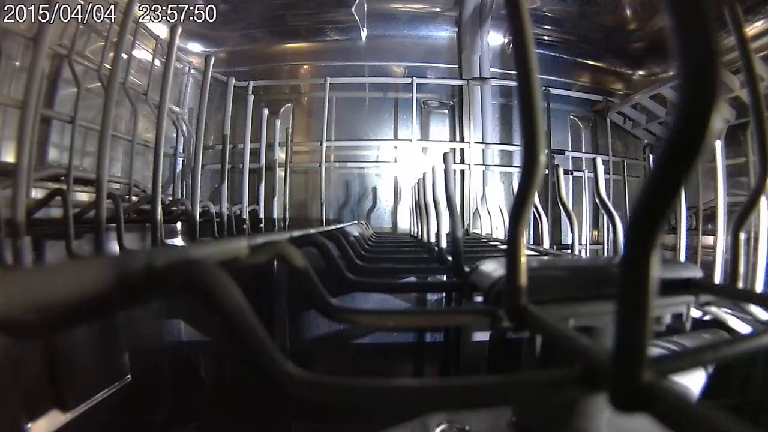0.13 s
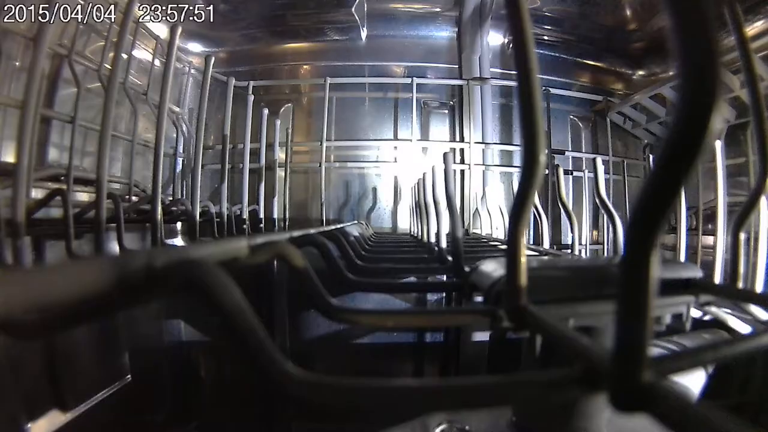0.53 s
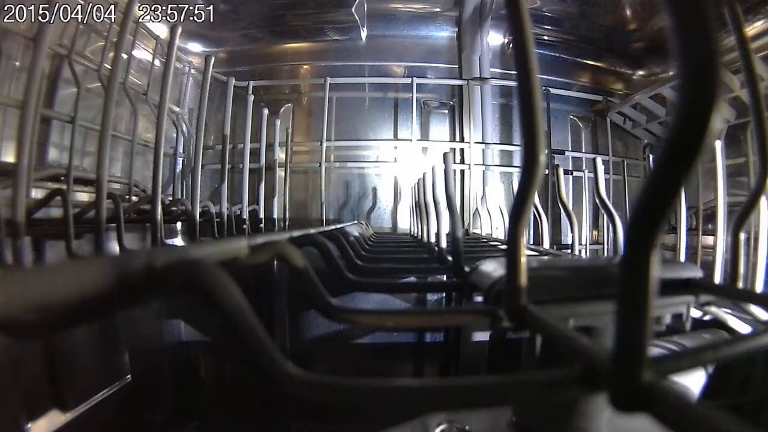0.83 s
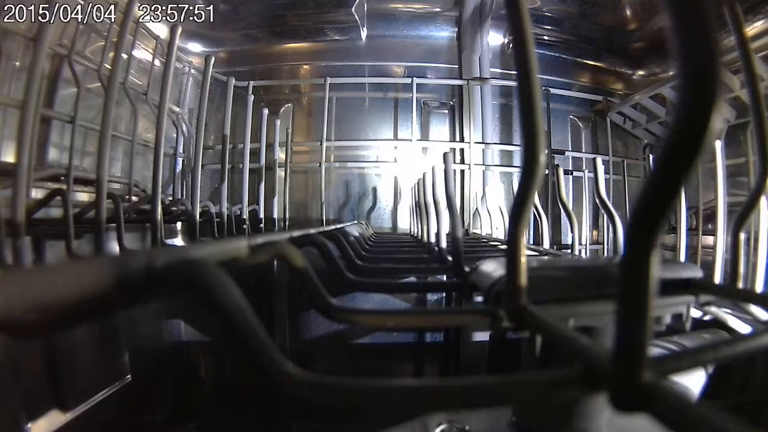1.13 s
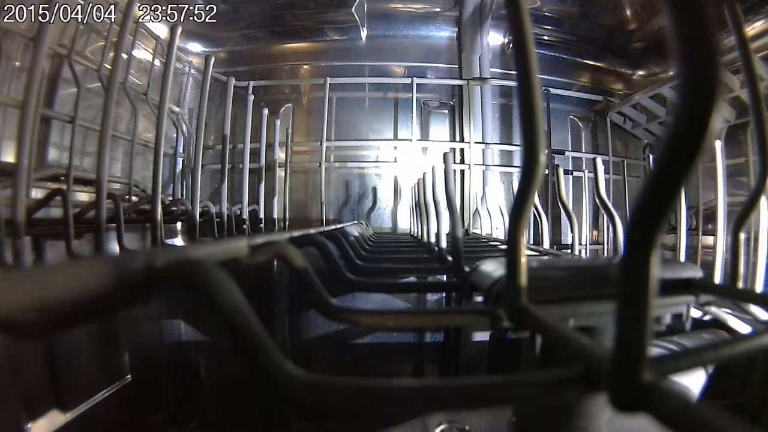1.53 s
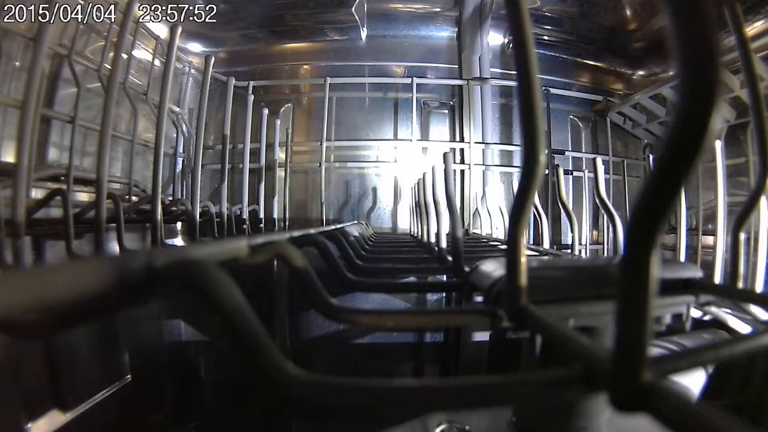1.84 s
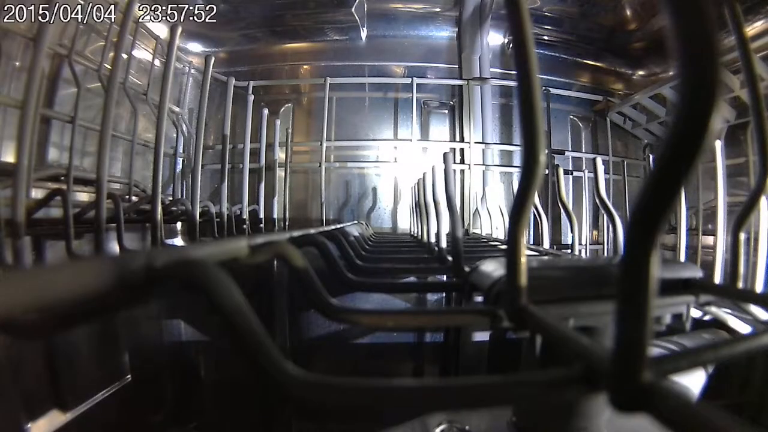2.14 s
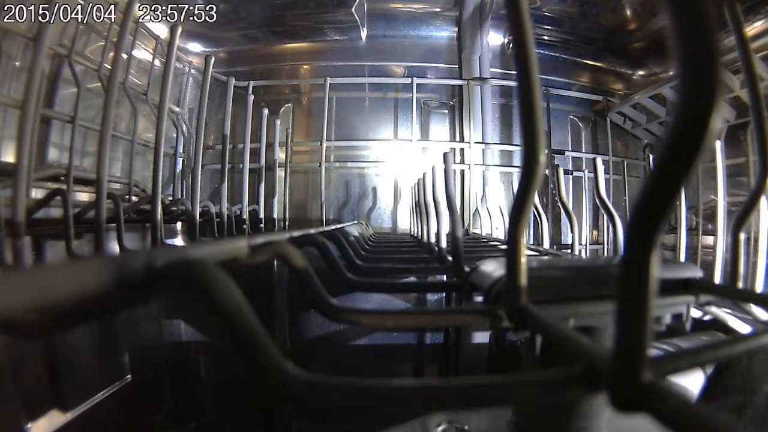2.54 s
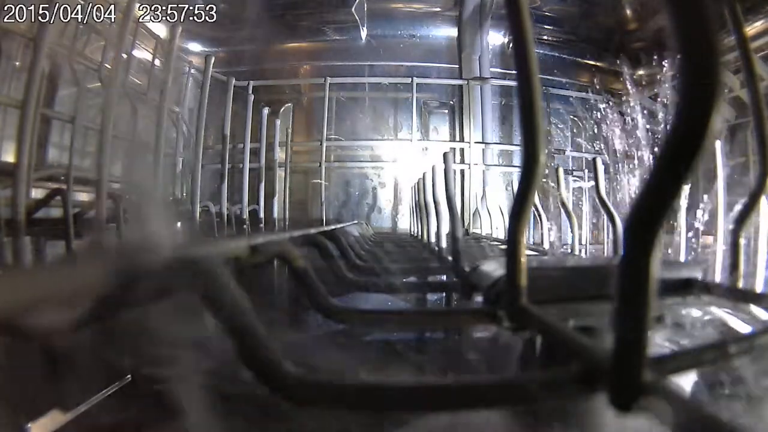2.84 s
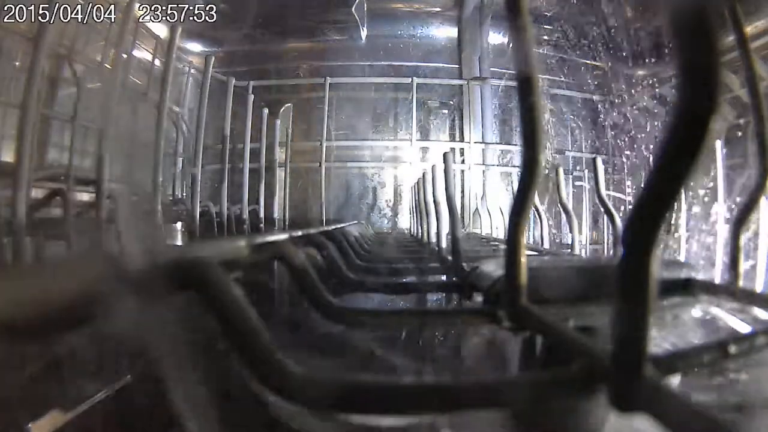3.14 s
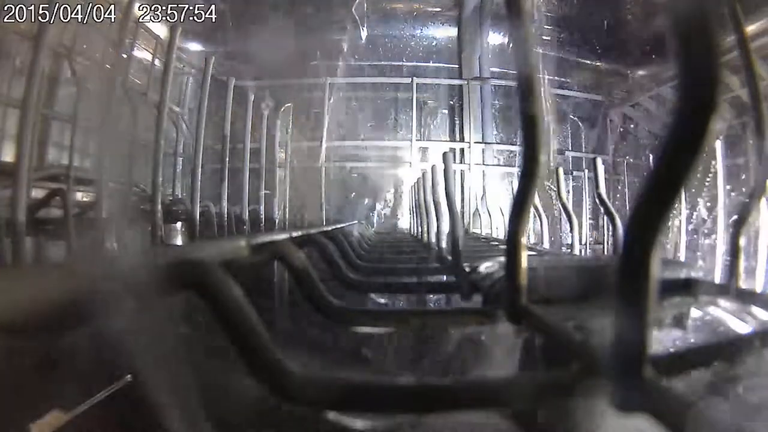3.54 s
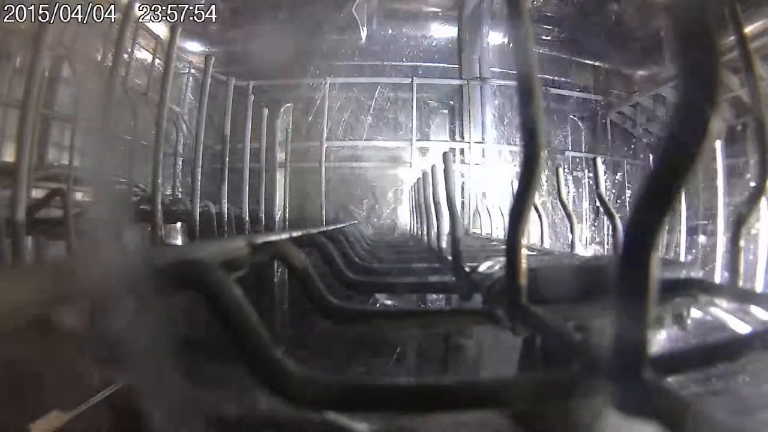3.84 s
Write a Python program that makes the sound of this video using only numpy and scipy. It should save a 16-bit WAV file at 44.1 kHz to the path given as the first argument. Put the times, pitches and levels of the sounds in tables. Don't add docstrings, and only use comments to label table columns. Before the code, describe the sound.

Water trickles and drips in a closed dishwasher, then the pump starts and jets beat hard

```python
import sys
import numpy as np
from scipy import signal
from scipy.fft import rfft, irfft, next_fast_len
from scipy.io import wavfile

SR = 44100
rng = np.random.default_rng(int(sys.argv[2]) if len(sys.argv) > 2 else 0)


def natural_amplitude(level_db):
    exponent = np.asarray(level_db, float) / 20
    return 10 ** exponent


def log_audio(samples):
    frames = np.atleast_2d(samples).T
    limited = np.clip(frames, -1, 1)
    pcm = np.round(limited * 32767).astype(np.int16)
    wavfile.write(sys.argv[1], SR, pcm)


N = 176400
TIME_S = np.arange(N) / SR

# pitch_hz, level_db
VALVE_HUM = [(59.9, -72), (99.8, -74.5), (119.9, -65)]
# pitch_hz, level_db
FILLING_MODES = [(250, -66), (415, -68), (522, -69.5), (640, -57.5), (695, -57), (974, -61.5), (1012, -73),
                 (1064, -63.5), (1130, -62), (1244, -60), (1384, -57.5), (1626, -63.5), (1895, -68),
                 (1997, -69)]
# pitch_hz, level_db
WASHING_MODES = [(269.2, -45.5), (425.3, -46), (516.8, -47.5), (640.6, -43), (694.4, -44.5), (775.2, -42),
                 (829.0, -43), (979.8, -41.5), (1017, -39), (1211, -37), (1351, -43), (1981, -44.5)]
# pitch_hz, level_db (per Hz)
TRICKLE_COLOUR = [(22, -2), (117, -2.5), (200, -14), (1400, -10.5), (2150, -15), (2450, -17.5),
                  (11000, -24.5), (16000, -34.5)]
# pitch_hz, level_db (per Hz)
SURGE_COLOUR = [(60, 4), (193, 10), (484, 0), (900, 5), (1300, 11), (2100, 4.5), (3300, 0), (4000, -20)]
# pitch_hz, level_db (per Hz)
JET_COLOUR = [(1500, 5.5), (2500, 0), (4000, -2.5), (5200, -3), (6700, -11.5), (7900, -6), (10500, 0.5),
              (16000, -5.5)]
# pitch_hz, width_hz, level_db
HOUSING_PEAKS = [(3065, 190, 3.5), (6650, 1160, 7), (7700, 1300, -5), (11000, 2260, 3)]
# start_s, level_db (peak), pitch_hz
POOL_DRIPS = [(0.136, -38, 1420), (0.219, -40, 1280), (0.345, -38, 1430), (0.694, -31.5, 1380),
              (1.031, -36, 1320), (1.18, -33.5, 1280), (1.251, -42, 1160), (1.365, -36.5, 990),
              (1.447, -33.5, 1250), (1.78, -29.5, 1750), (2.141, -21, 927), (2.199, -27, 900),
              (.075, -45, 2930), (.127, -46, 3610), (.135, -46.5, 5000), (.262, -38, 2090),
             (.345, -45.5, 2620), (.547, -45, 2170), (.66, -41.5, 1860), (0.697, -44, 2480),
             (.81, -47, 4250), (.89, -46, 2640), (1.032, -38.5, 3000), (1.04, -41, 4370),
             (1.24, -45.5, 4430), (1.26, -46, 2590), (1.38, -46, 2200), (1.375, -46.5, 4320),
             (1.755, -42.5, 2940), (1.782, -42, 2370), (1.819, -30.5, 1240), (1.896, -48, 4760),
             (1.997, -41, 1970), (2.04, -35, 1370), (2.2, -46, 4800)]
# start_s, level_db (peak), pitch_hz
STEEL_TICKS = [(.11, -57, 12000), (.334, -48.5, 7940), (.53, -54, 11000), (.73, -52, 10100),
               (.74, -53.5, 6800), (.85, -56, 11000), (.95, -57, 11900), (1.08, -55.5, 9800),
               (1.2, -54.5, 11000), (1.38, -57, 9100), (1.71, -57, 10500), (1.9, -52, 10000),
               (1.922, -45.5, 9150), (2.1, -53, 11000), (2.135, -51, 7700)]
# start_s, level_db (peak), pitch_hz
NEAR_SPLATS = [(.696, -25, 1400), (1.782, -27, 1850), (2.142, -26, 950), (3.731, -10, 2200),
               (3.731, -1, 800), (3.7, -7, 1000), (2.711, -5, 11000), (3.354, -17.5, 2900),
               (3.395, -16, 6860), (3.407, -18, 6500), (3.467, -14.5, 5200), (3.467, -5, 2580),
               (3.495, -8.5, 5300), (3.495, -18, 2200), (3.496, -4.5, 8000), (3.68, -12, 2200),
               (3.695, -20, 5500), (3.699, 0, 1630), (3.730, 2.5, 1560), (3.835, -13, 1300),
               (3.91, -20, 1400), (3.915, -20, 6600), (3.953, -18, 5500), (3.938, -10, 2040),
               (3.980, -11, 5270)]
# start_s, level_db (peak), pitch_hz
SHEET_SPLASHES = [(2.44, -15, 1350), (2.495, -23, 4230), (2.54, -15, 1170), (2.57, -18, 2050),
                  (2.61, -20, 2030), (2.675, -21, 3354), (2.7, -24.5, 3030), (2.711, -20, 11750),
                  (2.74, -18, 1310), (2.83, -19.5, 2040), (2.855, -27, 11000), (2.905, -21.5, 3200),
                  (2.965, -26, 3040), (3.065, -27, 11000), (3.13, -23, 1440), (3.3, -27, 2000),
                  (3.375, -28, 1390), (3.42, -26, 1440), (3.53, -25, 1370), (3.625, -29, 1190),
                  (3.355, -30, 2920), (3.555, -34.5, 5700), (3.59, -27, 311), (3.655, -31, 2880),
                  (3.732, -24, 1570), (3.77, -27, 1410), (3.88, -22, 970), (3.9, -25, 1290),
                  (3.92, -34, 5900)]
# time_s, level_db
SHAKE_CURVE = [(2.035, -48.5), (2.1, -33.5), (2.2, -47), (2.26, -39), (2.36, -29), (2.43, -24.5),
               (2.47, -34), (2.57, -37), (2.65, -30.5), (2.75, -30.5), (2.84, -35.5), (2.99, -32.5),
               (3.06, -36), (3.16, -31.5), (3.28, -34.5), (3.61, -36), (3.68, -33.5)]
# time_s, level_db
SURGE_CURVE = [(2.07, -49.5), (2.2, -42), (2.26, -29.5), (2.42, -22.5), (2.46, -22.5), (2.58, -21.5),
               (2.64, -28.5), (3.1, -29.5), (3.3, -35.5)]
# time_s, level_db
JET_CURVE = [(2.25, -63.5), (2.3, -53), (2.375, -41), (2.41, -22), (2.54, -24), (2.57, -25), (3.1, -26),
             (3.14, -31), (3.28, -33.5), (3.57, -33.5), (3.61, -36), (3.89, -38.5), (3.93, -35)]
# time_s, level_db
SPIT_CURVE = [(2.1, -60), (2.21, -60), (2.245, -64), (2.262, -52), (2.37, -48), (2.42, -44), (2.46, -80)]
# time_s, jets_db, surge_db
ARM_GUSTS = [(2.5, 0.5, -4), (2.71, 1, 0.5), (2.872, 3.5, 1), (3.07, 1.5, -1.5), (3.26, 0, 2.5),
             (3.36, -1, 2.5), (3.551, -0.5, 3), (3.66, -0.5, 4.5), (3.74, -1, 3), (3.882, -0.5, 3.5),
             (3.95, 1.5, 2.5)]
# start_s, end_s, pitch_hz, level_db
PIPE_PURGES = [
    (2.215, 2.37, 632, -35),
    (2.36, 2.41, 650, -38.5),
    (2.42, 2.54, 640, -32.5),
    (2.43, 2.54, 520, -40.5),
    (2.3, 2.43, 790, -37),
    (2.275, 2.43, 263, -41),
    (2.42, 2.54, 265, -33.5),
    (2.74, 2.86, 637, -36),
    (3.385, 3.48, 275, -34),
    (3.715, 3.816, 269, -43),
]

PUMP_START_S = 2.1
OPEN_S = 2.168
LAND_S, LANDING_S = 2.425, 0.019


def rms_one(x):
    return x / np.sqrt(np.mean(x ** 2) + 1e-20)


def noise():
    return rng.standard_normal(N)


def tone(hz):
    return np.sin(2 * np.pi * hz * TIME_S)


def drift(rate):
    r = np.exp(-80 * np.pi * rate / SR)
    slow = signal.lfilter([1], [1, -2 * r, r * r], rng.standard_normal(N // 40 + 2002))[2000:]
    return np.interp(np.arange(N) / 40, np.arange(len(slow)), rms_one(slow - slow.mean()))


def in_time(rows):
    before = (rows[0][0] - .04, -90)
    return np.interp(TIME_S, *np.transpose([before] + rows))


def butter(x, order, hz, kind="low"):
    return signal.sosfilt(signal.butter(order, hz, kind, fs=SR, output="sos"), x)


def resonance(x, hz, width_hz):
    r = np.exp(-np.pi * width_hz / SR)
    poles = [1, -2 * r * np.cos(2 * np.pi * hz / SR), r * r]
    return signal.lfilter([(1 - r * r) / 2, 0, (r * r - 1) / 2], poles, x + 1e-18)


def banded(colour, shared_db, own_db):
    out = 0
    together = drift(4) + .6 * drift(15)
    edges = 22 * 2 ** np.arange(0, 9.7, 1 / 3)
    white = rng.standard_normal((2, N))
    hz, db = np.transpose(colour)
    for k, (low, high) in enumerate(zip(edges, edges[1:])):
        band = butter(white[k % 2], 2, [low, high], "band")
        level = np.interp(np.log(low * high) / 2, np.log(hz), db, left=-80, right=-80)
        out = out + natural_amplitude(level + shared_db * together + own_db * drift(11.7)) * band
    return rms_one(out)


def tub_modes(modes, patchy_db, steady):
    out = 0
    for hz, db in modes:
        stirred = rms_one(resonance(noise(), hz, 12))
        ring = rms_one(stirred + steady * tone(hz))
        out = out + natural_amplitude(db + patchy_db * drift(3.7)) * ring
    return out


def tub(x):
    t60_s, echo_db = 0.5, -5
    size = next_fast_len(N + SR)
    one_sample = np.exp(-2j * np.pi * np.arange(size // 2 + 1) / size)
    echo = 0
    for k, lag in enumerate((rng.uniform(.006, .022, 10) * SR).astype(int)):
        loop = natural_amplitude(-60 * lag / SR / t60_s) * one_sample ** lag
        echo = echo + (-1) ** k * loop / (1 - loop)
    echo = echo / np.sqrt(np.mean(np.abs(echo) ** 2))
    return x + natural_amplitude(echo_db) * irfft(rfft(x, size) * echo, size)[:N]


def bursts(rows, t60_s, breadth, gain_db):
    out = np.zeros(N + SR)
    t = np.arange(SR // 4) / SR
    attack = np.minimum(t / 0.00052, 1)
    for start_s, db, hz in rows:
        puff = resonance(rng.standard_normal(len(t)), hz, breadth * hz)
        puff = rms_one(resonance(puff, hz, 2 * breadth * hz)) / 2
        i = int(start_s * SR)
        out[i:i + len(t)] += natural_amplitude(db + gain_db - 60 * t / t60_s) * attack * puff
    return out[:N]


def hum():
    loaded_db = 15.5 * np.clip((TIME_S - PUMP_START_S) / 0.1, 0, 1)
    return sum(natural_amplitude(db + loaded_db) * np.sqrt(2) * tone(hz) for hz, db in VALVE_HUM)


def filling():
    trickle = natural_amplitude(-55) * banded(TRICKLE_COLOUR, shared_db=.3, own_db=.6)
    sinking = np.clip((PUMP_START_S - TIME_S) / 0.077, .3, 1)
    return trickle + sinking * tub_modes(FILLING_MODES, patchy_db=.3, steady=1.1)


def gurgles():
    per_s = 120 * natural_amplitude(5 * drift(5))
    born = (rng.random(N) < per_s / SR) * natural_amplitude(rng.normal(0, 2, N))
    dealt = rng.integers(0, 12, N)
    out = 0
    for k, hz in enumerate(np.geomspace(950, 2500, 12)):
        ring = resonance(resonance(born * (dealt == k), hz, hz / 12), hz, hz / 8)
        out = out + ring * 1000 / hz
    return rms_one(out)


def drips():
    plops = bursts(POOL_DRIPS, t60_s=0.17, breadth=0.15, gain_db=-5)
    ticks = bursts(STEEL_TICKS, t60_s=0.14, breadth=0.35, gain_db=-1.5)
    return tub(plops + natural_amplitude(-60) * gurgles() + ticks)


def motor():
    speed_hz, wobble_db = 54.7, 1.5
    running = TIME_S > LAND_S
    shake = np.sqrt(2) * tone(speed_hz) * natural_amplitude(wobble_db * running * drift(4.0))
    rough = rms_one(resonance(noise(), speed_hz, 20.0))
    rumble = rms_one(resonance(resonance(noise(), 32, 28), 28, 44))
    return natural_amplitude(in_time(SHAKE_CURVE)) * (shake + natural_amplitude(-13) * rough + natural_amplitude(-12) * rumble)


def churn():
    bite_s, hz, width_hz = 2.07, 233, 215
    slosh = rms_one(resonance(resonance(noise(), hz, width_hz), hz, 2 * width_hz))
    times_s = [bite_s, bite_s + 0.055, OPEN_S, LAND_S, LAND_S + LANDING_S]
    primed = np.interp(TIME_S, times_s, [0.023, 0.63, 0.58, 0.7, 0.87])
    return primed * natural_amplitude(-43.5 + 3.3 * drift(15)) * slosh


def whistle(start_s, end_s, hz, db):
    phase = 2 * np.pi * np.cumsum(hz + 6 * drift(20)) / SR
    fade = np.clip(np.minimum(TIME_S - start_s, end_s - TIME_S) / 0.037, 0, 1)
    return fade * natural_amplitude(db + 3.0 + 1.9 * drift(24.0)) * np.sin(phase)


def spitting():
    air = butter(noise(), 2, [2200, 6500], "band")
    return natural_amplitude(in_time(SPIT_CURVE) + 0.82 * drift(30)) * rms_one(air)


def opening(x):
    dull = butter(x, 4, 2350)
    x = dull + np.clip((TIME_S - OPEN_S) / 0.31, 0, 1) * (x - dull)
    thin = butter(x, 4, 620, "high")
    return thin + np.clip((TIME_S - LAND_S) / LANDING_S, .08, 1) * (x - thin)


def surge():
    rush = rms_one(tub(banded(SURGE_COLOUR, shared_db=0.2, own_db=1.6)))
    ring = rms_one(tub_modes(WASHING_MODES, patchy_db=1.16, steady=0))
    return opening(rush + natural_amplitude(-2) * ring)


def splats():
    near = bursts(NEAR_SPLATS, t60_s=0.0083, breadth=0.11, gain_db=-3.5)
    return near + tub(bursts(SHEET_SPLASHES, t60_s=0.2, breadth=0.22, gain_db=0))


def spatter():
    per_s, cycles, spread_db = 1500, 4, 3
    sizes = natural_amplitude(spread_db * np.minimum(rng.exponential(1, N), 3.0)) * rng.choice([-1, 1], N)
    born = rng.random(N) < per_s * natural_amplitude(1.5 * drift(12)) / SR
    dealt = rng.integers(0, 16, N)
    out = 0
    for k, hz in enumerate(np.geomspace(900, 13000, 16)):
        out = out + resonance(sizes * born * (dealt == k), hz, 1.9 * hz / cycles)
    return rms_one(out)


def jets():
    spray = banded(JET_COLOUR, shared_db=.7, own_db=1.4)
    return rms_one(tub(spray + natural_amplitude(-8) * spatter()))


def scene():
    gusts = np.array(ARM_GUSTS)
    sweeps = np.exp(-((TIME_S - gusts[:, :1]) / 0.047) ** 2)
    jets_gust_db, surge_gust_db = gusts[:, 1:].T @ sweeps
    jets_db = in_time(JET_CURVE) + jets_gust_db
    surge_db = in_time(SURGE_CURVE) - 1.5 + surge_gust_db
    purge = sum(whistle(*row) for row in PIPE_PURGES)
    mix = hum() + filling() + drips() + motor() + churn() + purge + spitting()
    mix = mix + natural_amplitude(surge_db) * surge() + splats() + natural_amplitude(jets_db) * jets()
    return np.array([natural_amplitude(6.02) * mix, np.zeros(N)])


def low_pass(x):
    return signal.sosfilt(signal.butter(12, 17080, fs=SR, output="sos"), x)


def record(dry):
    x = dry
    for hz, width_hz, db in HOUSING_PEAKS:
        x = x + (natural_amplitude(db) - 1) * resonance(x, hz, width_hz)
    hiss = signal.lfilter([1, -.8], [1, -.3], rng.standard_normal((2, N)))
    x = np.tanh(x / 1.214) * 1.36 + natural_amplitude(-75) * hiss
    x = x * np.clip((TIME_S - 0.071) / 0.0017, 0, 1)
    x = signal.sosfilt(signal.ellip(10, .1, 75, 15800, fs=SR, output="sos"), x)
    return low_pass(x)


dry = scene()
out = record(dry)
log_audio(out)
```